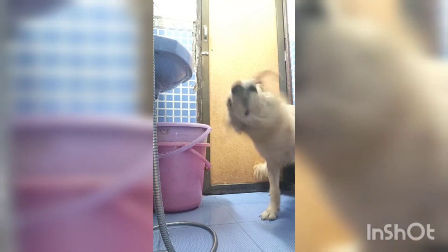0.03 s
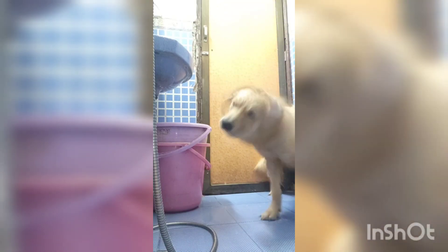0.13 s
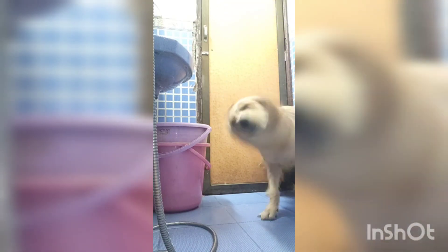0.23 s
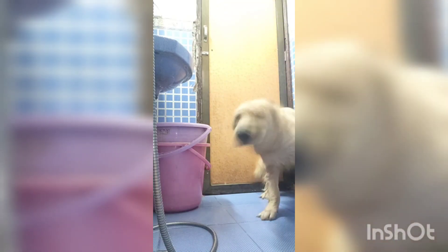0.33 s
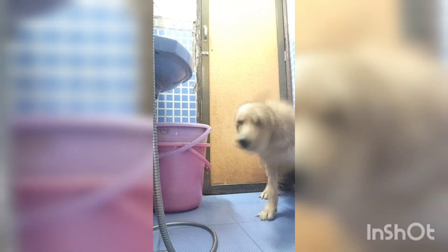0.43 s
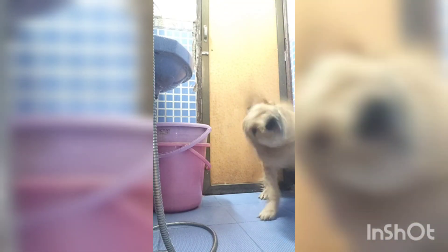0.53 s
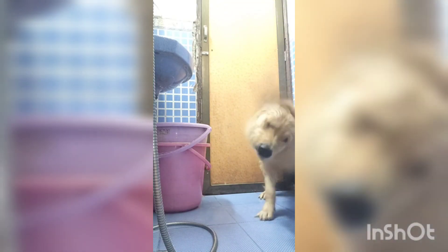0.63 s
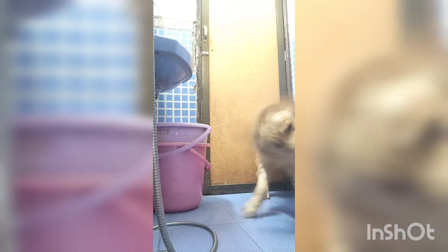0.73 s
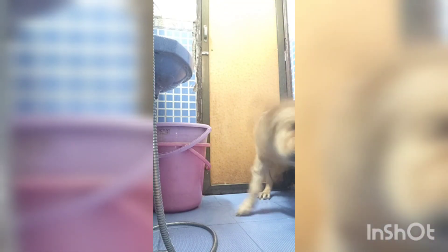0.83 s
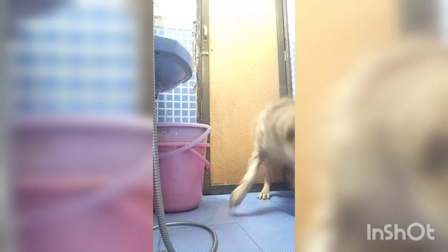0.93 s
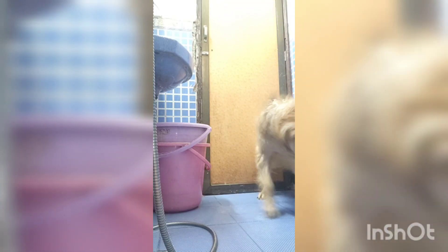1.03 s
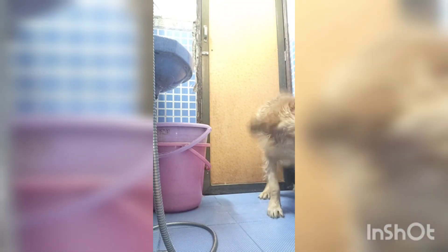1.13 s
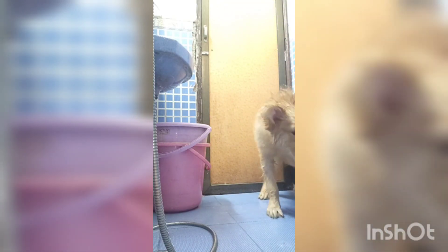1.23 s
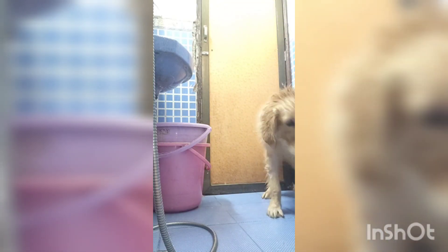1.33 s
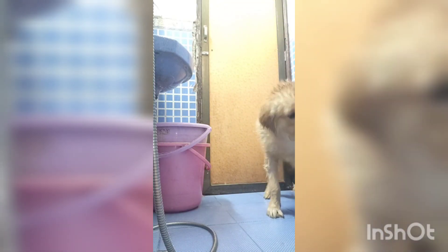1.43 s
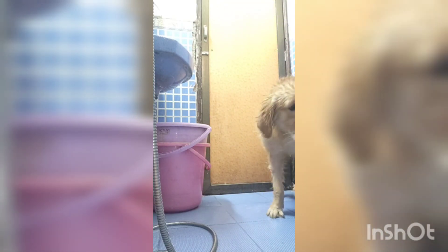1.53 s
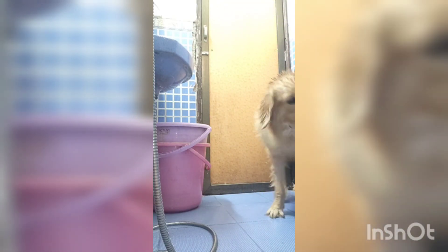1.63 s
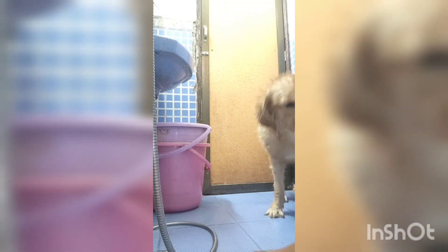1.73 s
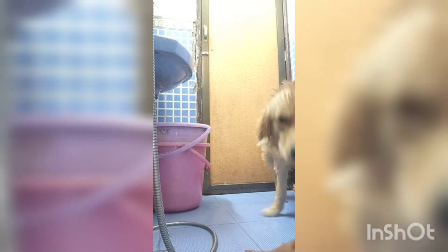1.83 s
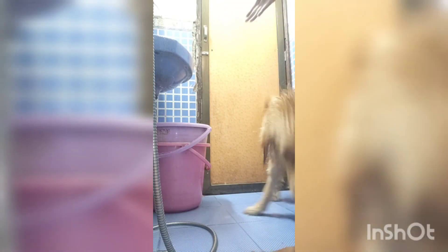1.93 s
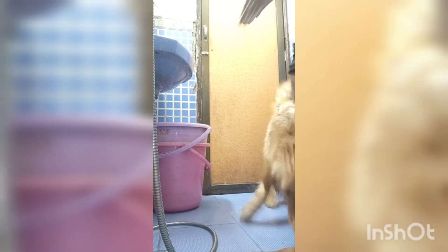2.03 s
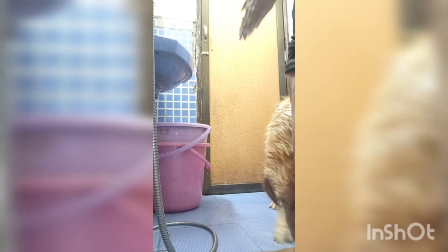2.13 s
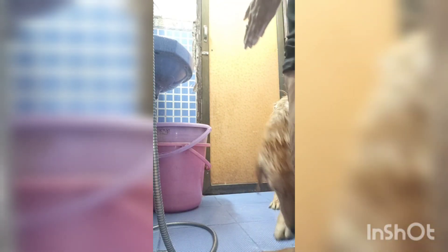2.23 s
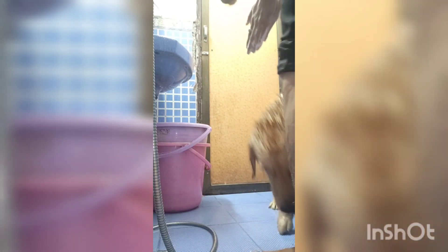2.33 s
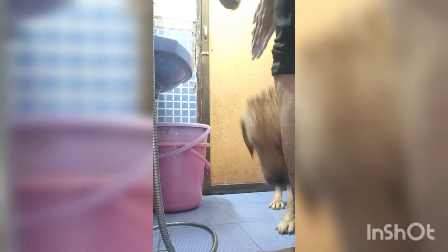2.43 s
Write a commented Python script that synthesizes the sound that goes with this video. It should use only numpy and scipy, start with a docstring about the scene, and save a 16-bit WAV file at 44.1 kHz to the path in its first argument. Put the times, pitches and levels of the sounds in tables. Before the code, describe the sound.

Wet dog shaking its coat, rapid wet flaps and slaps with spray in a small tiled bathroom

```python
"""In a small tiled bathroom a wet dog shakes itself: ears and coat slap wetly in quick succession and skin smacks,
each a short burst of coloured noise or a brief falling tone. Droplet noise makes the spray hiss on the tiles;
paws and body thump through broad resonances and ring the room's low modes over a wavering hum.
The left microphone is covered and hears mostly a boomy low end."""
import sys
import numpy as np
from scipy import signal
from scipy.fft import rfft, irfft
from scipy.io import wavfile
from scipy.ndimage import uniform_filter1d

SR = 44100
rng = np.random.default_rng(int(sys.argv[2]) if len(sys.argv) > 2 else 0)


def store_wav(level_fs):
    """Save 16-bit WAV to argv[1]."""
    pcm = np.round(np.clip(np.atleast_2d(level_fs), -1, 1) * 32767)
    wavfile.write(sys.argv[1], SR, pcm.T.astype(np.int16))


N = 110250
t = np.arange(N) / SR


def undb(db):
    """Decibel law: level in dB to amplitude gain."""
    return 10 ** (np.asarray(db) / 20)


def unit(x):
    """Normalisation to rms 1."""
    return x / np.sqrt(np.mean(x ** 2))


def curve(rows):
    """Amplitude envelope: gain over time, interpolated in dB."""
    return undb(np.interp(t, *np.array(rows).T))


def tone_db(points, size):
    """Spectral envelope: bin frequencies and their dB, interpolated over log frequency."""
    f = np.maximum(np.arange(size // 2 + 1) * SR / size, 1)
    p = np.array(points)
    return f, np.interp(np.log(f), np.log(p[:, 0]), p[:, 1], left=-60)


def shaped(noise, gain_db):
    """Linear filtering: weight the noise spectrum bin by bin."""
    return irfft(rfft(noise) * undb(gain_db), len(noise))


def filtered(x, order, edges_hz, kind="low"):
    """Linear filtering by a Butterworth response."""
    return signal.sosfilt(signal.butter(order, edges_hz, kind, fs=SR, output="sos"), x)


def grains(size, grain_db):
    """Granular excitation: noise whose strength jumps every 8 samples, as from grains of widely spread sizes."""
    strength = np.minimum(rng.exponential(size=size // 8 + 1), 3.5)
    held = np.repeat(strength, 8)[:size]
    return rng.standard_normal(size) * undb(grain_db * held)


def burst(size, attack_s, decay_s):
    """Transient envelope: rounded rise, exponential fall, peak 1."""
    u = np.arange(size) / SR
    rise = (1 - np.exp(-u / max(attack_s, 1e-4))) ** 2
    e = rise * np.exp(-u / max(decay_s, 1e-3))
    return e / e.max()


def add(out, s, x):
    """Superposition: mix x into out at s seconds."""
    i = max(int(s * SR), 0)
    out[i:i + len(x)] += x[:N - i]


def walk(size):
    """Slow random modulation: noise averaged twice over size samples, spread 1."""
    return unit(uniform_filter1d(uniform_filter1d(rng.standard_normal(N), size), size))


PATCHY_DB = 2.5  # flicker strength


def patchy(x):
    """Independent band modulation: drops land unevenly, so each octave flickers every few milliseconds."""
    out = 0
    f = np.arange(len(x) // 2 + 1) * SR / len(x)
    # bands centred on 700 Hz and up; the outer two take all that lies beyond
    octave = np.clip(np.round(np.log2(np.maximum(f, 1) / 700)), 0, 4)
    for k in range(5):
        steps = np.repeat(rng.standard_normal(len(x) // 256 + 1), 256)[:len(x)]
        flicker = uniform_filter1d(steps, 128)
        band = irfft(rfft(x) * (octave == k), len(x))
        out = out + undb(PATCHY_DB * flicker) * band
    return unit(out)


# wet slaps of ears and coat (t/s, level/dB, colour f/Hz, colour lift/dB, colour width/octaves,
# tilt/dB per octave, attack/s, decay/s)
SLAP_EVENTS = [(0.0, -38, 5600, 10, 0.093, -0.5, 0.0052, 0.012),
               (0.046, -28.5, 1560, 10.5, 0.98, 1.5, 0.0031, 0.027),
               (0.197, -27, 3080, 9.5, 0.5, -0.5, 0.0022, 0.034),
               (0.233, -26, 2420, 11, 0.35, 2, 0.0035, 0.029),
               (0.316, -25.5, 2500, 8, 0.35, -3.5, .0005, 0.0053),
               (0.371, -29, 3300, 26, 0.98, 5, 0.0013, 0.038),
               (0.432, -22.5, 1450, 0, 0.28, 0, 0.0047, 0.014),
               (0.456, -24, 9750, 11, 0.17, 2.5, 0.00091, 0.036),
               (0.536, -22, 2760, -1, 0.34, 0.5, 0.018, 0.017),
               (0.666, -23, 1290, -6, 1, -0.5, 0.003, 0.025),
               (0.771, -14.5, 4760, 5, .5, 1.5, 0.0004, 0.038),
               (0.82, -18.5, 1870, 7.5, 0.33, 2, 0.0018, 0.041),
               (0.905, -17, 1370, 17.5, 0.63, 4, 0.0008, 0.0084),
               (0.968, -17.5, 10130, 16, 0.13, 2, 0.00039, 0.012),
               (1.025, -22.5, 4130, 7.5, 0.22, -2, 0.0033, 0.019),
               (1.138, -22, 4900, 7.5, 0.43, 0.5, 0.0021, 0.042),
               (1.231, -31.5, 7000, 4, 0.79, 4, 0.0018, 0.027),
               (1.319, -33, 3520, 8, 0.24, 5, 0.0018, 0.012),
               (1.40, -27, 910, 39, 0.21, 9.5, 0.0017, 0.0062),
               (1.443, -34, 5070, -16, 0.25, 4.5, 0.0056, 0.044),
               (1.582, -31.5, 4600, 20, 0.71, 8.5, 0.00056, 0.05),
               (1.641, -27, 1500, -1, 0.32, 3, 0.00054, 0.0099),
               (1.711, -23.5, 3260, 6.5, 0.23, 3, 0.00098, 0.033),
               (1.764, -20.5, 5000, 2, 0.93, 2.5, 0.00074, 0.018),
               (1.841, -26, 3700, 13, 0.3, -1.5, 0.0011, 0.0061),
               (1.922, -31, 2820, 13, 0.77, 0.5, 0.0047, 0.023),
               (1.991, -27.5, 3300, 16, 0.9, 3, 0.0049, 0.038),
               (2.009, -31, 2980, -1, 0.5, 7, 0.0079, 0.029),
               (2.029, -21, 6000, 0.5, 0.5, 3.5, 0.015, 0.025),
               (2.069, -21, 7000, 5, 0.8, -1.5, 0.0034, 0.012), (2.08, -19, 2110, 5, 1, 0, 0.001, 0.01),
               (2.091, -32.5, 2950, 4, 0.31, -0.5, 0.0035, 0.11),
               (2.203, -26, 4360, 14, 0.65, 0, 0.0007, 0.028),
               (2.379, -40.5, 1480, 16, 0.69, -3, 0.0032, 0.037),
               (2.416, -39, 4170, 36, 1, -6.5, 0.0011, 0.011),
               (2.463, -36.5, 8660, 10, 0.15, 6.5, 0.0029, 0.007),
               (2.464, -31.5, 3060, 19, 0.25, 5, 0.00088, 0.0055),
               (2.478, -30, 2400, 22, 0.88, 4.5, 0.0034, 0.016)]
# spectrum common to the slaps (f/Hz, relative level per Hz/dB)
SLAP_SPECTRUM = [(180, 4), (300, -83), (354, -4.5), (509, -5.5), (553, -10), (781, -4), (2040, -6.5),
                 (3750, -11), (8280, -16.5), (15500, -36)]


def slaps():
    """Impulsive noise radiation: each slap throws a burst of droplets with its own spectral colour and tilt."""
    out, size = np.zeros(N), 8192
    f, base = tone_db(SLAP_SPECTRUM, size)
    for s, db, hz, lift_db, width, tilt_db, attack, decay in SLAP_EVENTS:
        lift = lift_db * np.exp(-.5 * (np.log2(f / hz) / width) ** 2)
        tilt = tilt_db * np.log2(f / 3000)
        drops = patchy(shaped(rng.standard_normal(size), base + lift + tilt))
        shape = burst(size, attack, decay)
        # restore the rms of the envelope, so that chance in the noise does not alter the level
        add(out, s, undb(db) * unit(drops * shape) * np.sqrt(np.mean(shape ** 2)))
    return out


SMACK_SAG = 0.023  # share of the starting pitch lost over one decay time
SMACK_SPLIT_HZ = 800  # parts dull smacks from bright ones
# short pitched smacks of wet skin and ears (t/s, level/dB, starting f/Hz, attack/s, decay/s)
SMACK_EVENTS = [(0.236, -16.5, 2320, .001, 0.0022), (0.245, -20, 2400, 0.0011, 0.0014),
                (0.316, -20, 1210, 0.00057, 0.0014), (0.441, -27, 1130, 0.00048, .002),
                (0.555, -17.5, 420, 0.0011, 0.0035), (0.579, -19.5, 294, 0.00078, 0.0026),
                (0.786, -20, 3100, 0.00092, .002), (0.813, -26, 560, 0.00077, 0.0013),
                (0.822, -21, 1640, 0.00073, 0.0023), (0.909, -18.5, 600, 0.00051, 0.006),
                (1.131, -7.5, 280, 0.00076, 0.0026), (1.149, -16, 222, 0.0025, 0.0066),
                (1.186, -16.5, 207, 0.0013, 0.0045), (1.296, -17, 490, 0.0018, 0.0044),
                (1.312, -17.5, 502, 0.0016, 0.0058), (1.346, -18.5, 165, 0.0017, 0.003),
                (1.404, -22, 896, 0.0018, 0.0062), (1.597, -10.5, 339, 0.00056, 0.0022),
                (1.605, -11, 337, 0.00053, 0.0012), (1.614, -13, 306, 0.00031, 0.0015),
                (1.767, -16, 1190, 0.00053, 0.0013), (1.8424, -8.5, 388, 0.00074, 0.0022),
                (1.848, -9.5, 403, .0008, 0.0017), (1.863, -15, 425, 0.0016, 0.002),
                (2.076, -10.5, 2110, 0.00082, 0.0018), (2.076, -18.5, 519, .001, 0.0023),
                (2.087, -27.5, 547, 0.00052, 0.0038), (2.473, -18, 2455, 0.0028, .002),
                (2.481, -20, 2250, .002, 0.0023)]


def smacks():
    """Damped oscillation: each smack traps a little air that rings and sags in pitch; returns dull, bright."""
    out, u = np.zeros((2, N)), np.arange(4096) / SR
    for s, db, hz, attack, decay in SMACK_EVENTS:
        phase = 2 * np.pi * hz * (u - SMACK_SAG * u ** 2 / (2 * decay))
        smack = burst(len(u), attack, decay) * np.sin(phase)
        add(out[int(hz > SMACK_SPLIT_HZ)], s, undb(db) * smack)
    return out


FIRST_PUSH = 1.8  # steady force, in units of the random force's spread
THUMP_OFFSET_DB = 18  # fixed offset from the table's level to the thump's rms, dB
# thumps of paws and body (t/s, relative level/dB, centre f/Hz, width/octaves, attack/s, decay/s)
THUMP_EVENTS = [(0.317, -15.5, 428, 0.94, 0.0013, 0.11), (0.436, -13, 600, 0.98, 0.00089, 0.019),
                (0.553, -9, 362, 1.8, 0.0015, 0.041), (0.58, -41, 80, 0.73, 0.0048, 0.013),
                (0.681, -9, 597, 1.4, 0.0014, 0.027), (0.807, -9, 435, 1.9, 0.0021, 0.014),
                (0.859, -7.5, 85.5, 2.4, 0.012, 0.024), (0.994, 0, 74, 1.8, 0.007, 0.021),
                (1.448, -34, 80, 1.1, 0.0092, 0.037), (0.906, -5, 630, 0.68, 0.0011, 0.033),
                (1.016, 6, 350, 3.3, 0.012, 0.0026), (1.056, -3.5, 520, 1.6, 0.00311, 0.027),
                (1.086, -0.5, 457, 1.2, 0.006, 0.015), (1.07, -17, 795, 0.63, .006, 0.025),
                (1.6, -12, 850, 0.53, 0.0012, .03), (1.845, -10, 900, 0.36, 0.0011, 0.057),
                (0.911, -6, 1010, .8, 0.00085, 0.028), (2.29, -34.5, 129, 0.33, 0.00585, 0.014),
                (2.401, -29, 128, .4, .006, 0.016), (1.132, -4.5, 292, 2, 0.00066, 0.052),
                (1.186, -7, 242, 0.43, 0.0016, 0.014), (1.242, -16, 130, 0.47, 0.0067, 0.037),
                (1.291, -5.5, 203, 4.5, 0.001, 0.029), (1.346, -6.5, 255, 1.1, 0.0021, 0.0078),
                (1.406, -5, 453, 0.58, 0.0014, 0.01), (1.43, -5, 225, 2.6, 0.0041, 0.039),
                (1.494, -10.5, 178, 1.6, 0.0032, 0.014), (1.544, -10, 320, 0.61, 0.0031, 0.054),
                (1.598, -0.5, 350, 1.86, 0.00084, 0.073), (1.65, -36, 129, 1.4, 0.0051, 0.0054),
                (1.726, -5.5, 167, 0.44, 0.00359, 0.027), (1.765, -6, 328, 2.5, 0.00092, 0.019),
                (1.822, -0.5, 180, 0.34, 0.003, 0.0014), (1.842, -2.5, 427, 1.7, 0.0012, 0.054),
                (1.899, -3.5, 450, 2.2, 0.0031, 0.012), (1.937, -3.5, 192, 0.29, 0.006, 0.007),
                (1.977, -32, 182, 0.4, 0.0015, 0.01), (2.042, -17.5, 206, 1.7, 0.0037, 0.015),
                (2.11, -16, 477, 0.28, 0.00297, 0.049), (2.167, -34, 140, 0.35, 0.0044, 0.026),
                (2.286, -21.5, 219, 0.53, 0.0061, 0.0061), (2.4, -23.5, 194, 0.4, 0.0059, 0.02)]


def thumps():
    """Forced resonance: a first push, then a flurry of smaller ones, drives the soft body's broad resonance."""
    out, size = np.zeros(N), 4096
    for s, db, hz, width, attack, decay in THUMP_EVENTS:
        force = rng.standard_normal(size)
        force[:int(3 * attack * SR)] += FIRST_PUSH
        edges = hz * 2. ** np.array([-width / 2, width / 2])
        x = filtered(force * burst(size, attack, decay), 1, edges, "band")
        # steeper skirts on both sides
        x = filtered(x, 1, edges[1])
        x = filtered(x, 1, edges[0], "high")
        add(out, s, undb(db - THUMP_OFFSET_DB) * x / x[:int(3 * decay * SR)].std())
    return out


SPRAY_GRAIN_DB, FLURRY_DB = 2.5, 1  # spread of drop sizes, swing of the flurries
# level of the spray hiss (t/s, level/dB)
SPRAY_LEVEL = [(0.0, -33.5), (0.14, -42.5), (0.27, -33.5), (0.38, -35), (0.77, -34.5), (0.92, -27),
               (0.99, -24.5), (1.2, -32.5), (1.42, -33.5), (1.99, -33), (2.1, -26), (2.22, -39),
               (2.5, -50.5)]
# spectrum of the spray (f/Hz, relative level per Hz/dB)
SPRAY_SPECTRUM = [(300, -24), (500, -9), (800, 2.5), (1100, 2), (2000, 1), (4000, 0), (8140, -7.5),
                  (12000, -14.5), (15500, -39)]


def spray():
    """Granular noise: the sum of many fine drops landing on the tiles in uneven flurries."""
    _, base = tone_db(SPRAY_SPECTRUM, N)
    drops = patchy(shaped(grains(N, SPRAY_GRAIN_DB), base))
    return curve(SPRAY_LEVEL) * undb(FLURRY_DB * walk(size=900)) * drops


SHUFFLE_HZ, SHUFFLE_GRAIN_DB = 600, 7.5  # low-pass corner, spread of contact strengths
# level of the low shuffle of paws and body (t/s, level/dB)
SHUFFLE_LEVEL = [(0, -51), (.28, -49.5), (.6, -38.5), (.95, -31), (1.3, -32.5), (1.7, -32.5), (2.0, -36),
                 (2.18, -53), (2.27, -47), (2.5, -60)]


def shuffle():
    """Random excitation of resonances: scattered dull contacts keep the low modes going."""
    dull = filtered(grains(N, SHUFFLE_GRAIN_DB), 2, SHUFFLE_HZ)
    return curve(SHUFFLE_LEVEL) * unit(ring(dull))


# low modes of the room (f/Hz, relative level/dB, t60/s)
LOW_MODES = [(74, -24, 0.13), (86.5, -14, 0.3), (123.7, -17, 0.86), (136.2, -11, 0.93), (173, -18, 0.9),
             (186, 0, 0.66), (229.6, 7, 0.49), (330, -45, 0.52), (350, -3, 0.82), (374.2, 5, 0.44),
             (468, 3, 0.35), (500.4, -5.5, 0.49), (579.5, 8, 0.11), (600, -9, 0.047), (690.5, 14, 0.084),
             (850, -17, 0.1)]


def ring(x):
    """Modal superposition: each low mode of the room rings, exponentially damped, on what strikes it."""
    u = np.arange(SR // 2) / SR
    h = sum(undb(db - 60 * u / t60) * np.sin(2 * np.pi * hz * u) for hz, db, t60 in LOW_MODES)
    return signal.fftconvolve(x, h / np.sqrt(np.sum(h ** 2) * SR / 1200))[:N]


PREDELAY_S, ECHO_HOLD_S = 0.0036, .15  # silence before the tail, time between new tails
# reverberation of the tiles by band (f/Hz, t60/s)
TILE_BANDS = [(200, 0.41), (500, 0.26), (1200, 0.22), (2800, 0.26), (6000, 0.078), (12000, 0.2)]


def echo(x):
    """Diffuse reverberation: two unrelated tails, each band decaying at its own rate, renewed at fixed intervals."""
    u, out, hold = np.arange(SR // 2) / SR, np.zeros((2, N)), int(ECHO_HOLD_S * SR)
    for i in range(-hold, N, hold):
        # overlapping windows cross-fade from one pair of random tails to the next
        window = np.hanning(2 * hold)[max(-i, 0):N - i]
        part = x[max(i, 0):i + 2 * hold] * window
        noise = rng.standard_normal((2, len(u)))
        tails = 0
        for hz, t60 in TILE_BANDS:
            band = filtered(noise, 2, [hz / 3.25, min(hz * 1.42, 2e4)], "band")
            tails = tails + band * undb(-60 * u / t60)
        tails = tails * (u > PREDELAY_S)
        for side, tail in zip(out, tails):
            add(side, max(i, 0) / SR, signal.fftconvolve(part, tail / np.sqrt(np.sum(tail ** 2))))
    return out


HUM_WAVER_HZ, HUM_THROB_DB = 3.67, 1.5  # spread of pitch and of level
# level of the hum (t/s, level/dB)
HUM_LEVEL = [(0, -45), (.3, -41), (.55, -36), (.75, -41.5), (1.3, -30), (2.0, -32), (2.2, -53), (2.5, -71)]
# lines of the hum (mean f/Hz, relative level/dB)
HUM_PARTIALS = [(113, -12), (137, 2)]


def hum():
    """Random frequency and amplitude modulation: two low lines waver in pitch and level."""
    out = 0
    for hz, db in HUM_PARTIALS:
        phase = 2 * np.pi * np.cumsum(hz + HUM_WAVER_HZ * walk(size=2000)) / SR
        out = out + undb(db + HUM_THROB_DB * walk(size=1200)) * np.sin(phase)
    return curve(HUM_LEVEL) * out


ROOM_TONE_DB = -56  # rms level
# spectrum of the steady room tone (f/Hz, relative level per Hz/dB)
ROOM_SPECTRUM = [(30, -6), (70, -9), (130, -7), (300, 1), (520, 0), (900, -15), (3000, -7), (15500, -30)]


def room_tone():
    """Stationary noise with a fixed spectral envelope: a faint background, strongest around 300 to 500 Hz."""
    _, base = tone_db(ROOM_SPECTRUM, N)
    return undb(ROOM_TONE_DB) * unit(shaped(rng.standard_normal(N), base))


MODES_DB, THUMP_DIRECT_DB = -10, -12
ECHO_DB, THUMP_ECHO_DB, SMACK_ECHO_DB = -1, -8.5, -8.5  # echo of wet sounds, thumps, dull smacks
LEFT_DIRECT_DB, LEFT_ECHO_DB = -8.5, 2
SHARED_BELOW_HZ = 443  # both sides hear the same sound below this


def scene():
    """Direct and reverberant fields: both sides share the lows; above, the left hears relatively more echo."""
    dull, bright = smacks()
    wet, low = slaps() + bright, thumps()
    low_echo = echo(undb(THUMP_ECHO_DB) * low + undb(SMACK_ECHO_DB) * dull)
    echoes = undb(ECHO_DB) * echo(wet) + low_echo
    modes = undb(MODES_DB) * unit(ring(low)) * low.std()
    body = undb(THUMP_DIRECT_DB) * low + modes + dull + shuffle() + hum() + room_tone()
    left = undb(LEFT_DIRECT_DB) * wet + undb(LEFT_ECHO_DB) * echoes[0] + spray() + body
    right = wet + echoes[1] + spray() + body
    high = signal.butter(2, SHARED_BELOW_HZ, "high", fs=SR, output="sos")
    split = signal.sosfiltfilt(high, left - right)
    return np.array([right + split, right])


COVER_HZ, COVER_Q = 600, 3.0  # resonance of the covered left port
COVER_DB, COVER_LAG_S, LEAK_DB = -2.5, .0001, -40.5
LOWCUT_HZ, TOP_HZ, BOTH_DB = 66, 15600, -0.27


def record(dry):
    """Resonant low-pass: the covered left port booms, with a faint leak; both sides lose deep bass and top."""
    w = 2 * np.pi * COVER_HZ
    b, a = signal.bilinear([w * w], [1, w / COVER_Q, w * w], SR)
    covered = undb(COVER_DB) * signal.lfilter(b, a, dry[0])
    left = np.interp(t - COVER_LAG_S, t, covered) + undb(LEAK_DB) * dry[0]
    both = undb(BOTH_DB) * np.array([left, dry[1]])
    both = filtered(both, 8, LOWCUT_HZ, "high")
    return signal.sosfilt(signal.ellip(10, .2, 70, TOP_HZ, fs=SR, output="sos"), both)


dry = scene()
out = record(dry)
store_wav(out)
```